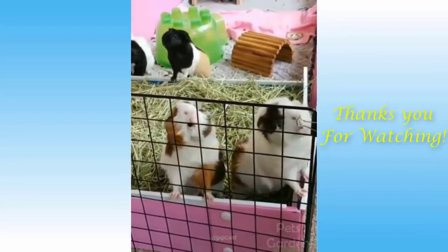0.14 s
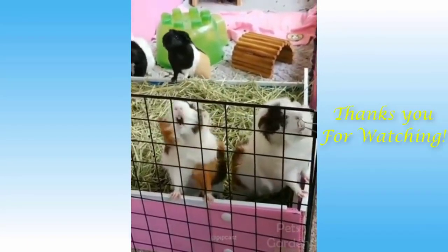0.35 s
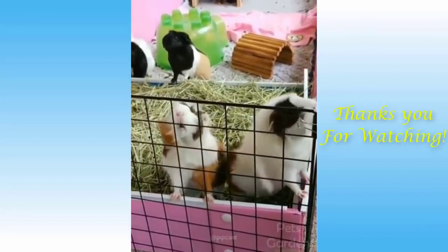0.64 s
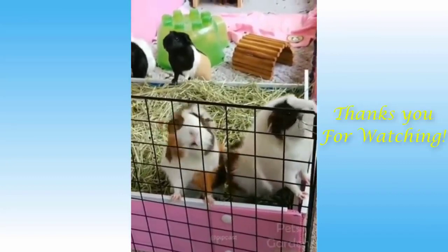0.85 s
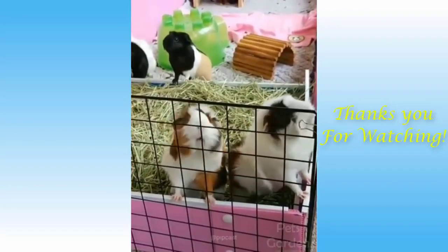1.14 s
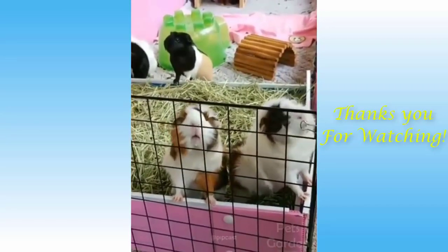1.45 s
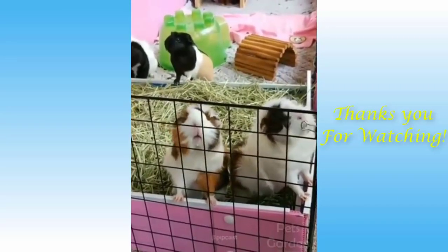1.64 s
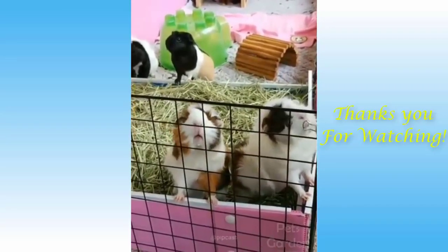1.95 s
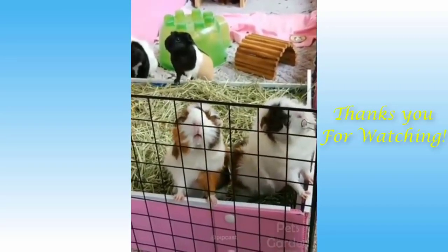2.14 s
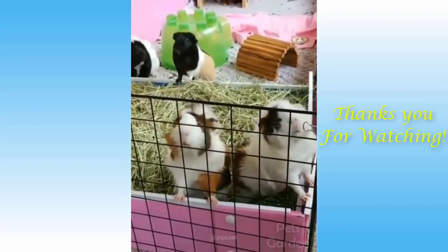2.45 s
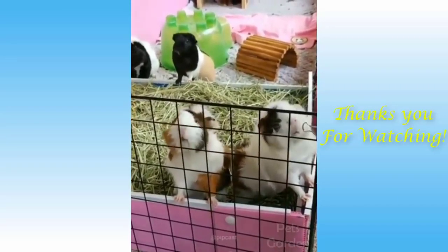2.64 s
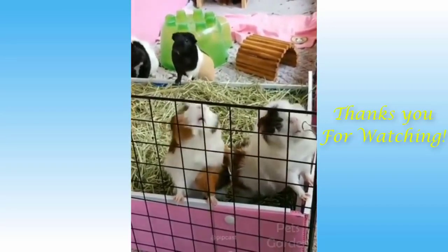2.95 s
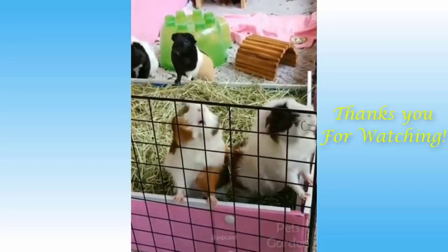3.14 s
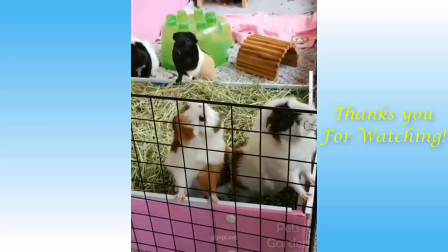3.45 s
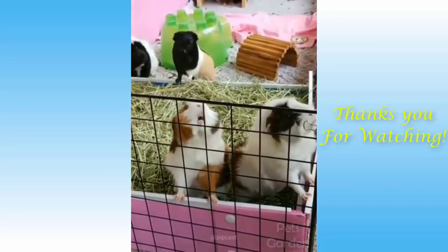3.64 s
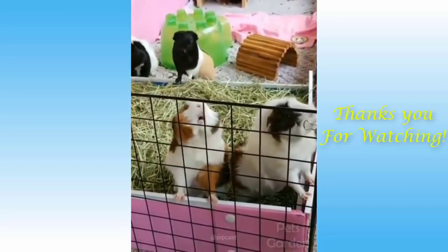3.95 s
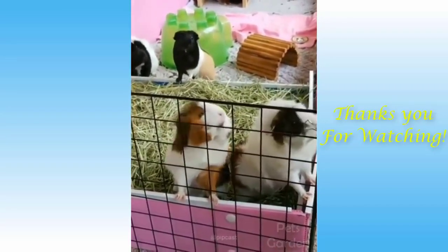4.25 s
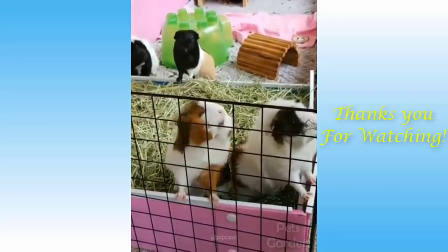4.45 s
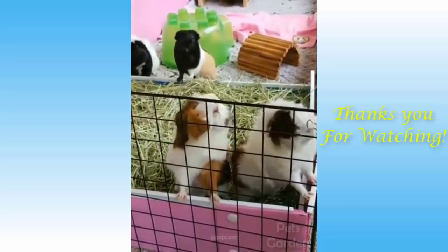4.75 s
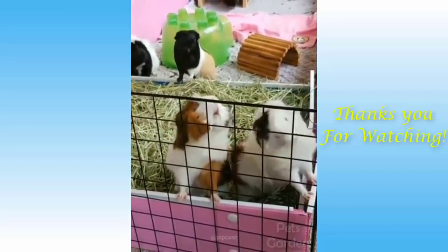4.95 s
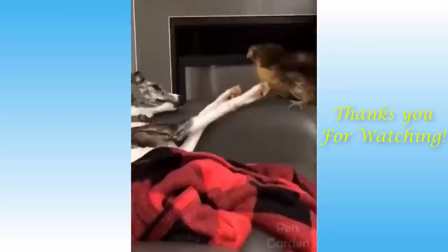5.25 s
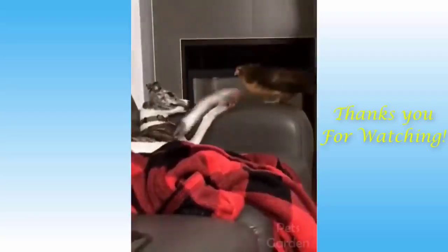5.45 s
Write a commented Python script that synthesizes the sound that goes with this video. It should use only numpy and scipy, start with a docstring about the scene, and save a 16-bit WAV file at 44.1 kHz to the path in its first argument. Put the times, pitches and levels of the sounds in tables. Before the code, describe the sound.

A few dull knocks on a plastic pen wall open the sound, with rustling hay and the quiet rumble of a small room. At the same time a guinea pig close to the microphone gives a loud rising call that breaks into a shrill squeal, ending at 0.7 seconds. A softer rising call follows from 0.8 to 1.2 seconds. Until about 3 seconds, other guinea pigs further back make thin peeps and soft scooping chirps, among light bumps on the wall. From 3 to 3.8 seconds the near animal gives another loud climbing squeal, hoarse and cracking, with a faint companion call underneath. Two more knocks land at about 3.6 and 3.9 seconds as the hay rustle swells. Soft chirps, some short and some drawn out and slowly rising, continue until the sound ends at about 5.3 seconds.

```python
"""A dull knock on a pen's plastic wall comes first, over rustling hay and a small room's quiet rumble.
Close to the microphone a guinea pig begs at the wire fence with three rising wheeks: a loud one that
breaks upward into a shrill squeal, a soft one, and a hoarse one that cracks. Its vocal folds give the
tone, turbulent air the rasp. Further back the others answer with thin peeps and soft scooping chirps.
More blows set the wall ringing; a high hiss swells as hay rustle and as breath around the loud wheeks."""
import sys
import numpy as np
from scipy import signal
from scipy.io import wavfile

SR = 44100
rng = np.random.default_rng(int(sys.argv[2]) if len(sys.argv) > 2 else 0)


def persist_wave(psi):
    """Save psi, clipped to +-1, as 16-bit WAV."""
    counts = np.round(np.clip(psi, -1, 1) * 32767).astype(np.int16)
    wavfile.write(sys.argv[1], SR, np.atleast_2d(counts).T)


N = 246519
TIME = np.arange(N) / SR

# blows on the pen wall: start_s, level_db, brightness_db, shake_db
KNOCKS = [(0.003, -20, -14, -44), (0.21, -22, -9, -43), (0.416, -21.5, -12.5, -35),
          (0.633, -32, -15.5, -41), (1.647, -32, -7.5, -52), (1.881, -28, -7.5, -47),
          (2.086, -36.5, -14.5, -60), (2.306, -34, -9.5, -71), (2.514, -32.5, -3.5, -66),
          (2.715, -32.5, -6.5, -63), (3.647, -17, -7, -34), (3.87, -23.5, -6, -43)]
# modes of the plastic wall: frequency_hz, gain_db, t60_s
WALL_MODES = [(232.6, -4, 0.15), (256, -4, 0.12), (315.2, -2.5, .11), (409.8, -3, 0.082), (495, -2, 0.029),
              (664, -5, 0.057), (731.5, -10, 0.19), (875, -12.5, 0.016), (1320, -16, 0.012),
              (1423, -14.5, .06)]
# swells of high hiss (hay rustle, breathy noise around the loud wheeks): middle_s, half_width_s, level_db
HISS_SWELLS = [(.05, .2, -46.5), (.55, .2, -47.5), (1.05, .18, -51.5), (2.05, .35, -53.5),
               (2.75, .3, -57.5), (3.3, .1, -49), (3.63, .06, -45), (3.84, .15, -47.5), (4.5, 0.22, -52)]
# spectra of that hiss, the steady room tone and the rumble: frequency_hz, density_db
HISS_COLOUR = [(1500, 7.5), (2400, 0), (3400, -0.5), (4600, -2.5), (6500, -1), (8300, -10.5), (10000, -6),
               (12500, -7), (14000, -1.5)]
ROOM_TONE_COLOUR = [(60, -9.5), (150, -14.5), (300, -14), (450, -24.5), (800, -17.5), (1200, -21.5),
                    (1800, -43), (3000, -35.5), (6000, -38), (10000, -46.5), (14000, -43.5)]
RUMBLE_COLOUR = [(25, -21.5), (45, -12.5), (65, 1), (100, -6.5), (150, -15.5), (250, -30.5), (500, -71.5)]
# slow course of the room's rumble: time_s, level_db
RUMBLE_LEVEL = [(0, -49), (1.8, -56.5), (2.3, -61), (3.0, -48), (3.8, -45.5), (4.3, -50.5), (5.0, -47)]
# thin peeps from further back: start_s, length_s, start_hz, end_hz, level_db
PEEPS = [(.005, 0.13, 2827, 2680, -53.5), (0.799, 0.079, 4400, 4610, -57), (1.212, .28, 2175, 3404, -53.5),
         (1.838, 0.0374, 2650, 2250, -48), (1.881, 0.042, 2255, 2520, -49.5)]
# the near animal's three wheeks and a companion's faint one: time_s, pitch_hz, effort_db, shrill_db
LOUD_WHEEK = [(.035, 860, -50.5, -13), (.055, 1222, -41.5, -15), (.15, 1297, -38, -11.5),
              (.21, 1477, -36.5, -11), (.3, 1635, -35, -2.5), (.33, 1808, -23.5, -20), (.36, 2064, -27, -6),
              (.41, 2201, -20.5, -17), (.447, 2357, -15.5, -15), (.453, 2616, -18, -7.5),
              (.488, 2850, -15, -7.5), (.495, 3018, -15, -15), (.583, 3460, -17, -8),
              (.661, 3558, -18.5, -24), (.67, 4700, -17.5, -25.5)]
SOFT_WHEEK = [(.805, 706, -47, -9), (.83, 546, -55, -1), (.865, 563.7, -46.5, -11), (.935, 1060, -47, -18),
              (.97, 1075, -52, -2.5), (1.0, 1250, -43, -6.5), (1.06, 1251, -42.5, -3.5),
              (1.12, 1385, -35.5, -10.5), (1.155, 1572, -36.5, -2), (1.18, 1704, -36, -4),
              (1.203, 1964, -28.5, -34)]
HOARSE_WHEEK = [(3.05, 508, -55.5, -22), (3.1, 708, -43, -20), (3.15, 1071, -42.5, -32),
                (3.26, 1260, -38, -18), (3.325, 1587, -40.5, -5.5), (3.355, 1696, -29, -19.5),
                (3.385, 1921, -28, -16), (3.495, 2272, -22, -22.5), (3.507, 2680, -18.5, -29.5),
                (3.525, 2621, -17.5, -27), (3.547, 2808, -15, -24), (3.58, 2850, -17, -31),
                (3.675, 3386, -22.5, -24.5), (3.712, 3480, -17.5, -28), (3.728, 3840, -25, -36),
                (3.75, 3980, -40, -25)]
COMPANION_WHEEK = [(3.27, 1136, -54, -1), (3.33, 1316, -51.5, -2.5), (3.375, 1292, -51.5, 5)]
# mouth resonances that a wheek's two lowest partials sweep through: frequency_hz, gain_db
WHEEK_MOUTH = [(550, -7.5), (1050, 5), (1400, -9), (1900, -3.5), (2450, 1), (3100, -17), (3500, -12),
               (4000, -16.5), (4700, -4.5), (6200, 7), (7100, 1.5), (9000, -3)]
# throat colour of a wheek's overtones and hiss: frequency_hz, gain_db
WHEEK_THROAT = [(2000, 18), (3600, 0.5), (5300, -8.5), (6300, 9.5), (7100, 3), (7700, 1.5), (8600, 6.5),
                (9600, -9), (10500, -19.5), (11500, -7), (12500, -15.5), (13500, 4), (14200, -16)]
# bursts of rasp where the voice cracks: middle_s, half_width_s, rasp_db
RASPS = [(.555, .012, -18), (.668, .007, -2), (3.44, .06, -24.5), (3.523, .012, -10.5), (3.65, .015, -19.5),
         (3.735, 0.02, -6.5)]
# period doubling in the hoarse wheek: time_s, depth (0-1)
PERIOD_DOUBLING = [(3.595, 0), (3.612, 0.03), (3.66, 0.7), (3.675, 0)]
# short chirps from further back: dip_s, fall_s, rise_s, low_hz, top_hz, level_db, overtone_db
SHORT_CHIRPS = [(.58, 0.035, 0.056, 942, 1400, -52.5, -8), (1.08, 0.043, 0.062, 536.5, 1050, -48.5, -2),
                (1.345, 0.039, 0.11, 621, 1364, -41.5, -11), (1.79, .04, 0.07, 622, 1436, -53.5, 6.5),
                (2.44, 0.0055, .07, 593, 1506, -52, -3), (2.565, .015, 0.092, 627, 1336, -44, -9.5),
                (2.75, .005, 0.064, 644, 1406, -51, -2.5), (2.825, 0.032, 0.059, 602, 1140, -47.5, -8.5),
                (3.28, 0.012, 0.094, 625, 1193, -53, -9), (3.52, .005, 0.11, 685, 1416, -51, -2),
                (3.685, .005, 0.087, 694, 1776, -45, -1), (3.945, 0.028, 0.074, 583, 1775, -39.5, -5),
                (4.035, 0.0049, .075, 649, 1543, -47, -6), (4.18, 0.063, 0.18, 1138, 1840, -47.5, -10),
                (4.62, 0.053, 0.084, 621, 1277, -38.5, -10), (4.715, .005, .07, 955, 1847, -48.5, -6.5),
                (4.875, 0.043, .11, 624.6, 1220, -37.5, -11), (4.975, .005, 0.064, 900, 1490, -45, -11)]
# chirps that hold on and climb slowly: the same columns, then hold_s, end_hz
LONG_CHIRPS = [(1.618, 0.038, 0.071, 630, 997, -42, -9.5, 0.19, 1206),
               (2.09, 0.028, 0.052, 596, 922, -45.5, -16, .22, 1172),
               (4.236, .015, .055, 615, 876, -38.5, -10.5, .18, 1134),
               (5.172, 0.053, 0.058, 616, 847, -39.5, -13.5, 0.08, 1070)]
# mouth resonances of the chirps: frequency_hz, gain_db
CHIRP_MOUTH = [(600, -10.5), (820, -4), (1050, -0.5), (1270, -8.5), (1550, -7.5), (2000, -17.5),
               (2550, -9.5), (3300, -20), (4500, -11.5), (6500, -26)]
# reflections reaching the microphone off floor, pen and furniture: delay_s, gain_db
REFLECTIONS = [(.0023, -32.5), (.0052, -28), (.0091, -17.5), (0.0151, -18.5)]

END_S, CUTOFF_HZ = 5.328, 13950


def from_db(db):
    """Decibels to gain."""
    return 10 ** (np.asarray(db) / 20)


def rms_one(x):
    """Scale to rms 1."""
    return x / np.sqrt(np.mean(x ** 2) + 1e-20)


def butter_filter(x, order, hz, kind):
    """Butterworth low-, high- or band-pass."""
    return signal.sosfilt(signal.butter(order, hz, kind, fs=SR, output="sos"), x)


def at_hz(spectrum, hz):
    """Read a spectrum's dB on a log-frequency axis."""
    points_hz, points_db = np.transpose(spectrum)
    return np.interp(np.log(hz), np.log(points_hz), points_db)


def drift(rate_hz, size):
    """Random wander of rms 1: noise twice through a one-pole low-pass."""
    pole, settle = np.exp(-2 * np.pi * rate_hz / SR), 8000
    noise = rng.standard_normal(size + settle)
    return rms_one(signal.lfilter([1], [1, -2 * pole, pole * pole], noise)[settle:])


def ring(clicks, hz, t60_s):
    """One damped mode: a unit click sets a sine of height 1 ringing."""
    pole, angle = from_db(-60 / (t60_s * SR)), 2 * np.pi * hz / SR
    return signal.lfilter([0, np.sin(angle)], [1, -2 * pole * np.cos(angle), pole * pole], clicks + 1e-18)


def coloured(spectrum, sources):
    """Half-octave bands, drawn in turn from two excitations and weighted by a spectrum; rms 1."""
    edges = 22 * 2 ** np.arange(0, 10, .5)
    out = 0
    for k, (low, high) in enumerate(zip(edges, edges[1:])):
        band = butter_filter(sources[k % 2], 2, [low, high], "band")
        out += band * from_db(at_hz(spectrum, np.sqrt(low * high)))
    return rms_one(out)


def swells(rows, rest_db):
    """Gain of bell-shaped swells over a resting level; their powers add."""
    power = sum(from_db(db) ** 2 * np.exp(-((TIME - s) / width) ** 2) for s, width, db in rows)
    return np.sqrt(from_db(rest_db) ** 2 + power)


def wall_knocks(ring_db=-4, thud_db=-12, thud_t60_s=.08):
    """Each soft blow rings the wall's main modes; its many small modes merge into a dry thud."""
    start_s, level_db, bright_db, _ = np.transpose(KNOCKS)
    onsets = (start_s * SR).astype(int)
    blows, ringing = np.zeros((2, N))
    blows[onsets] = from_db(level_db)
    for k, (hz, mode_db, t60_s) in enumerate(WALL_MODES):
        scatter_db = rng.standard_normal(len(onsets))
        lift_db = (hz > 600) * (bright_db - bright_db.mean())
        clicks = blows.copy()
        clicks[onsets] *= from_db(mode_db + scatter_db + lift_db)
        ringing += (-1) ** k * ring(clicks, hz, t60_s)
    decay = signal.lfilter([1], [1, -from_db(-60 / (thud_t60_s * SR))], blows + 1e-18)
    thud = decay * rms_one(butter_filter(rng.standard_normal(N), 3, [260, 850], "band"))
    return butter_filter(from_db(ring_db) * ringing + from_db(thud_db) * thud, 2, 2400, "low")


def hay_and_breath(gain_db=-3, snaps_per_s=5000, spread_db=3):
    """Tiny snaps merge into a high hiss: dry hay rustling, and breathy noise around the loud wheeks."""
    snapping = rng.random((2, N)) < snaps_per_s / SR
    polarity = rng.choice([-1, 1], (2, N))
    strength = from_db(spread_db * np.minimum(rng.exponential(1, (2, N)), 5))
    hiss = butter_filter(coloured(HISS_COLOUR, snapping * polarity * strength), 2, 1500, "high")
    return from_db(gain_db) * swells(HISS_SWELLS, rest_db=-61) * rms_one(hiss)


def room_tone_and_shaking(noise_db=-52, drone_db=-52, lumpy_db=3, shake_peak_s=.03):
    """The room's steady noise, wavering drone and lumpy rumble; the pen shakes deeply after each knock."""
    drone = rms_one(ring(rng.standard_normal(N), hz=67, t60_s=.6))
    rumble_db = np.interp(TIME, *np.transpose(RUMBLE_LEVEL)) + lumpy_db * drift(3.3, N)
    rumble = from_db(rumble_db) * coloured(RUMBLE_COLOUR, rng.standard_normal((2, N)))
    shaking = rms_one(butter_filter(rng.standard_normal(N), 2, [38, 65], "band"))
    for start_s, _, _, shake_db in KNOCKS:
        age = np.maximum(TIME - start_s, 0) / shake_peak_s
        rumble += from_db(shake_db) * age * np.exp(1 - age) * shaking
    steady = coloured(ROOM_TONE_COLOUR, rng.standard_normal((2, N)))
    return from_db(noise_db) * steady + rumble + from_db(drone_db) * drone


def fold_phase(pitch_hz, waver, jitter, wobble=.005):
    """Phase of the vocal folds: slow wobble, quicker waver and fast jitter, each a share of the pitch."""
    size = len(pitch_hz)
    unsteady = wobble * drift(18, size) + waver * drift(67, size) + jitter * drift(1100, size)
    return 2 * np.pi * np.cumsum(pitch_hz * (1 + unsteady - unsteady.mean())) / SR


def call_gate(start_s, end_s, attack_s=.016, release_s=.0096):
    """The samples that a call covers and its envelope: attack, hold, release."""
    span = np.flatnonzero((TIME > start_s - attack_s / 2) & (TIME < end_s + release_s / 2))
    t = TIME[span]
    ramp = np.minimum((t - t[0]) / attack_s, (t[-1] - t) / release_s)
    return span, np.sin(np.pi / 2 * np.clip(ramp, 0, 1)) ** 2


def peep(start_s, length_s, start_hz, end_hz, level_db, flutter_db=2):
    """A thin, wavering whistle on a straight glide."""
    span, gate = call_gate(start_s, start_s + length_s)
    phase = fold_phase(np.linspace(start_hz, end_hz, len(span)), waver=.025, jitter=.012)
    gain = from_db(level_db + flutter_db * drift(46, len(span)))
    out = np.zeros(N)
    out[span] = np.sqrt(2) * gate * gain * np.sin(phase)
    return out


def wheek(rows, waver, jitter, flutter_db, hiss_db, octave_db, tilt_db, breathy_db, doubling=np.zeros(N)):
    """A rising harmonic squeal; turbulent air lays a rasp around each partial and a hiss between them."""
    time_s, *curves = np.transpose(rows)
    span, gate = call_gate(time_s[0], time_s[-1], attack_s=.0068, release_s=.0068)
    pitch_hz, effort_db, shrill_db = (np.interp(TIME[span], time_s, curve) for curve in curves)
    phase, size = fold_phase(pitch_hz, waver, jitter), len(span)
    fundamental = from_db(effort_db + at_hz(WHEEK_MOUTH, pitch_hz))
    octave = from_db(effort_db + at_hz(WHEEK_MOUTH, 2 * pitch_hz) + octave_db)
    # partials 3-12 share the shrill level, coloured by the throat
    shrill = from_db(effort_db + shrill_db)
    orders = np.arange(3, 13)[:, None]
    overtones = from_db(at_hz(WHEEK_THROAT, orders * pitch_hz) + tilt_db * np.log2(orders))
    overtones *= np.clip((CUTOFF_HZ + 50 - orders * pitch_hz) / 300, 0, 1)
    overtones *= shrill / np.sqrt(np.sum(overtones ** 2, axis=0) + 1e-3)
    raspiness = swells(RASPS, breathy_db)[span]
    voice = np.zeros(size)
    for k, gain in enumerate([fundamental, octave, *overtones], 1):
        unsteady = np.sqrt(k) / 2   # higher partials flutter and rasp more
        tone = np.sin(k * phase) * from_db(unsteady * flutter_db * drift(47, size))
        rasp = unsteady * (drift(360, size) * np.sin(k * phase) + drift(410, size) * np.cos(k * phase))
        # alternating strong and weak cycles add tones halfway between the partials
        alternation = 1 + (k > 1) * doubling[span] * np.sin(phase / 2)
        voice += np.sqrt(2) * gain * (tone * alternation + raspiness * rasp)
    hiss = butter_filter(coloured(WHEEK_THROAT, rng.standard_normal((2, size))), 3, 5500, "high")
    voice += hiss * np.hypot(octave, shrill) * raspiness * from_db(hiss_db)
    out = np.zeros(N)
    out[span] = voice * gate
    return out


def chirp(dip_s, fall_s, rise_s, low_hz, top_hz, level_db, overtone_db, hold_s=0, end_hz=None,
          fall_hz_per_s2=93000, swell_db_per_s=70.5, rolloff_db=-8, flutter_db=2):
    """A soft call of three unsteady partials that dips, scoops upward and may hold on."""
    span, gate = call_gate(dip_s - fall_s, dip_s + rise_s + hold_s)
    t = TIME[span] - dip_s
    before_dip, after_dip = np.minimum(t, 0), np.maximum(t, 0)
    scoop_hz = (top_hz - low_hz) * (after_dip / rise_s) ** 1.7
    pitch_hz = low_hz + fall_hz_per_s2 * before_dip ** 2 + scoop_hz
    if hold_s:
        pitch_hz = np.where(t < rise_s, pitch_hz, top_hz + (end_hz - top_hz) * (t - rise_s) / hold_s)
    phase = fold_phase(pitch_hz, waver=.015, jitter=.0085)
    effort_db = level_db + swell_db_per_s * before_dip   # gathers strength on the way into the dip
    out = np.zeros(N)
    for k in range(1, 4):
        db = effort_db + at_hz(CHIRP_MOUTH, k * pitch_hz) + (k > 1) * (overtone_db + rolloff_db * (k - 2))
        db += np.sqrt(k) * flutter_db * drift(60, len(span))
        out[span] += np.sqrt(2) * gate * from_db(db) * np.sin(k * phase)
    return out


def small_room(direct, near_db, tail_db, t60_s=.31):
    """Near reflections make gliding tones swell and dip at the microphone; a duller tail follows."""
    t = TIME[:SR // 2]
    delay_s, echo_db = np.transpose(REFLECTIONS)
    near = np.zeros(len(t))
    near[(delay_s * SR).astype(int)] = from_db(echo_db + near_db)
    tail = rng.standard_normal(len(t)) * from_db(-60 * t / t60_s) * (t > .008)
    tail = butter_filter(tail / np.linalg.norm(tail), 1, 5000, "low")
    return direct + signal.fftconvolve(direct, near + from_db(tail_db) * tail)[:N]


def scene():
    """One microphone by the pen: wheeks close up, chirps and peeps further back with more room on them."""
    wheeks = wheek(LOUD_WHEEK, waver=.004, jitter=.002, flutter_db=3.5,
                   hiss_db=6.5, octave_db=-8, tilt_db=1, breathy_db=-38)
    wheeks += wheek(SOFT_WHEEK, waver=.0057, jitter=.0087, flutter_db=3.5,
                    hiss_db=11, octave_db=-2.5, tilt_db=.5, breathy_db=-37)
    wheeks += wheek(HOARSE_WHEEK, waver=.0079, jitter=.004, flutter_db=4,
                    hiss_db=-6, octave_db=-16, tilt_db=-6.5, breathy_db=-30.5,
                    doubling=np.interp(TIME, *np.transpose(PERIOD_DOUBLING)))
    wheeks += wheek(COMPANION_WHEEK, waver=.003, jitter=.005, flutter_db=3,
                    hiss_db=7, octave_db=-6.5, tilt_db=.5, breathy_db=-15.5)
    close = small_room(wheeks, near_db=2.5, tail_db=-12)
    chirps = sum(chirp(*row) for row in SHORT_CHIRPS + LONG_CHIRPS)
    peeps = sum(peep(*row) for row in PEEPS)
    further_back = small_room(chirps + peeps, near_db=0, tail_db=-7)
    pen = small_room(wall_knocks(), near_db=-.5, tail_db=-8) + hay_and_breath()
    return (close + further_back + pen + room_tone_and_shaking())[None]


def record(dry):
    """The microphone feed fades out in 6 ms shortly before the end; a steep low-pass cuts the top."""
    fade = np.clip((END_S - TIME) / .006, 0, 1)
    return signal.sosfilt(signal.ellip(12, .2, 90, CUTOFF_HZ, fs=SR, output="sos"), dry * fade)


dry = scene()
out = record(dry)
persist_wave(out)
```